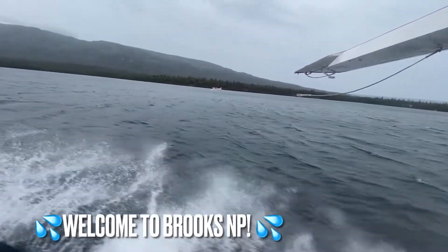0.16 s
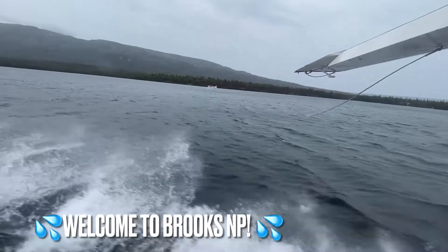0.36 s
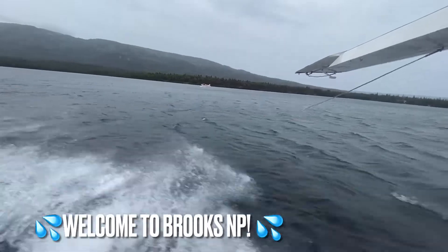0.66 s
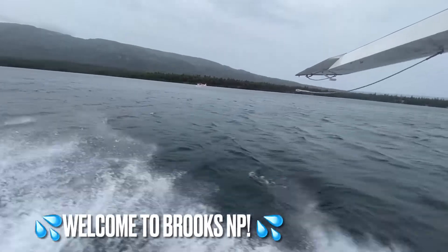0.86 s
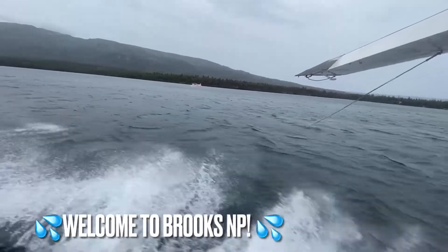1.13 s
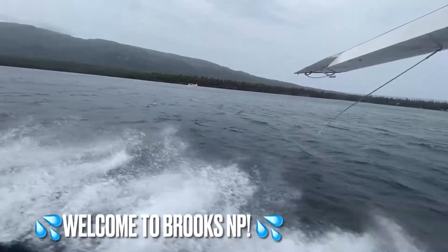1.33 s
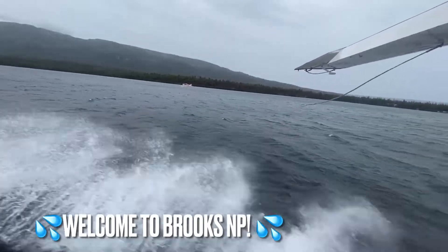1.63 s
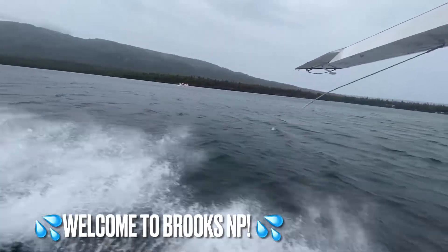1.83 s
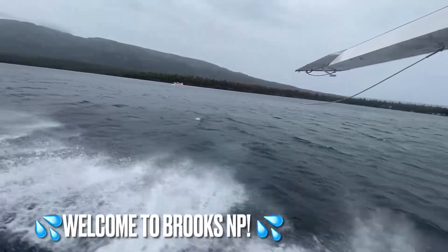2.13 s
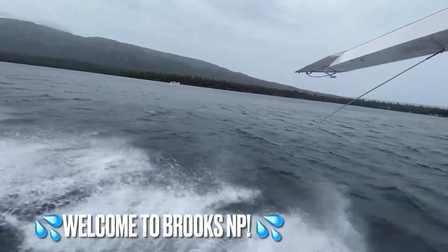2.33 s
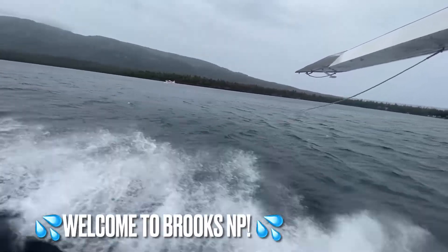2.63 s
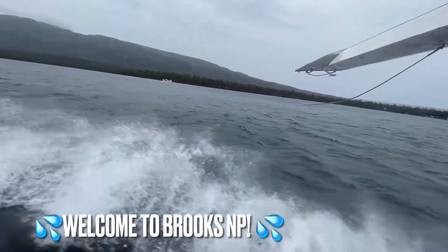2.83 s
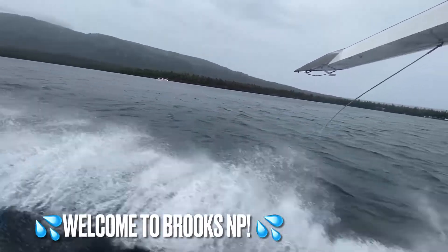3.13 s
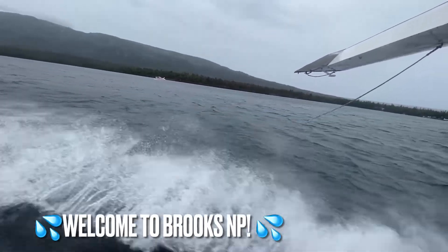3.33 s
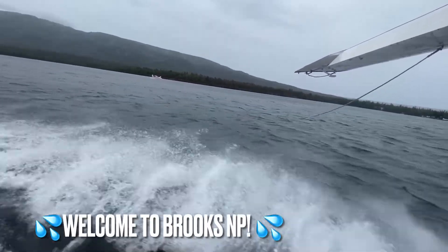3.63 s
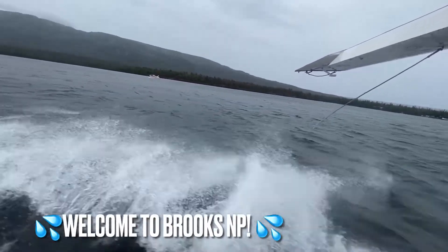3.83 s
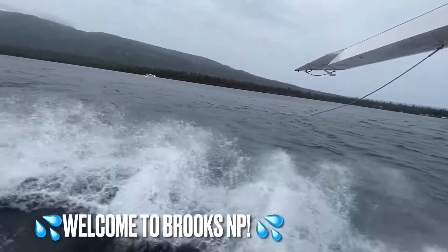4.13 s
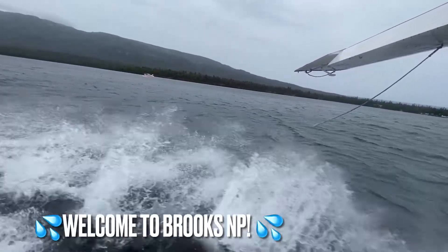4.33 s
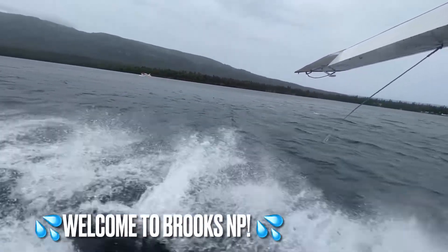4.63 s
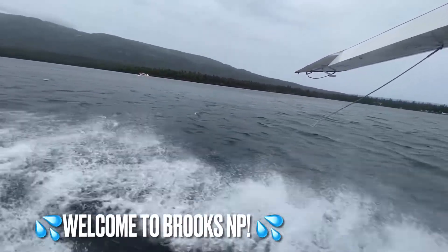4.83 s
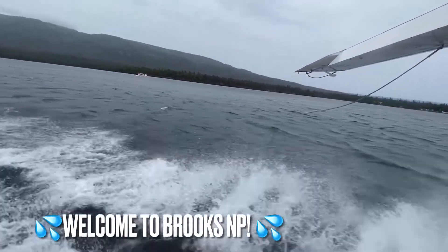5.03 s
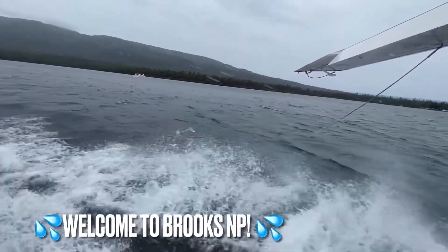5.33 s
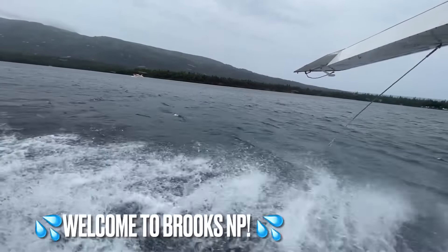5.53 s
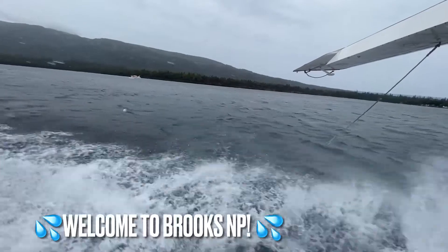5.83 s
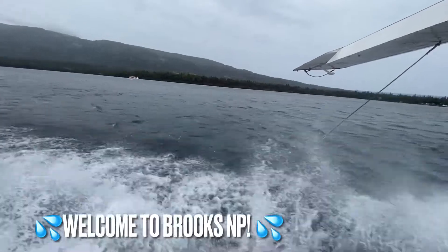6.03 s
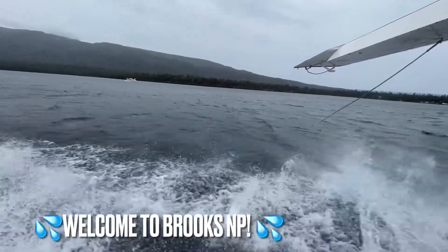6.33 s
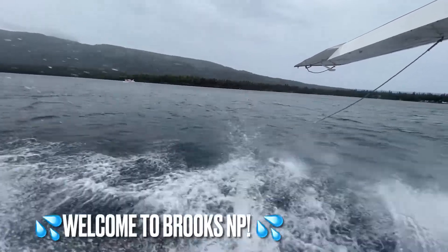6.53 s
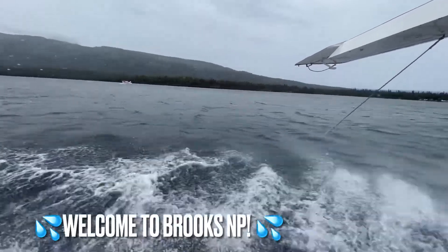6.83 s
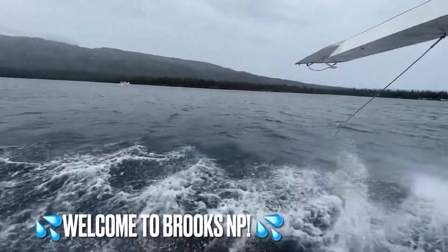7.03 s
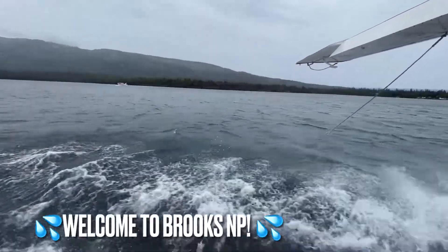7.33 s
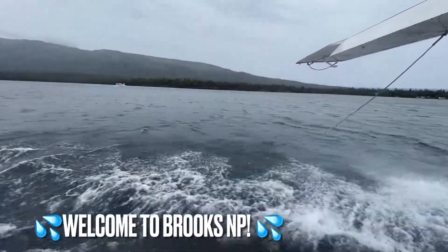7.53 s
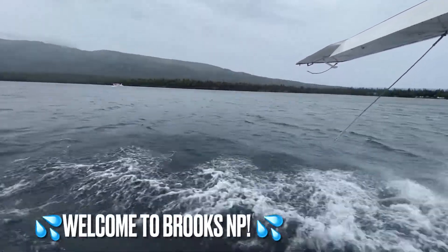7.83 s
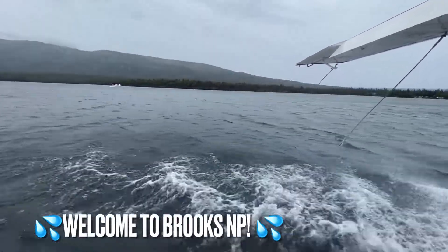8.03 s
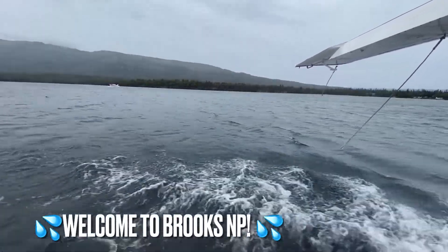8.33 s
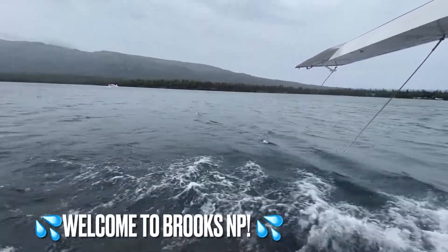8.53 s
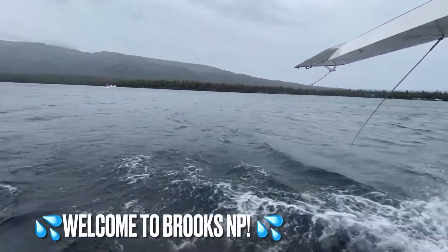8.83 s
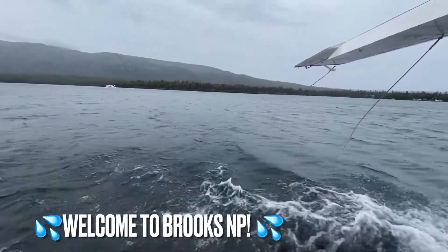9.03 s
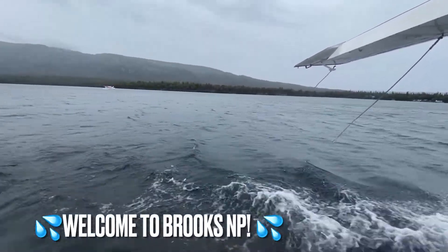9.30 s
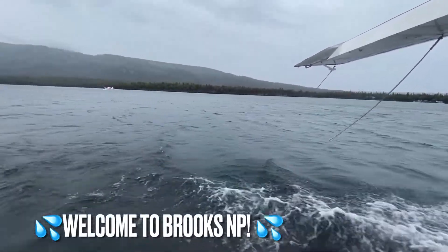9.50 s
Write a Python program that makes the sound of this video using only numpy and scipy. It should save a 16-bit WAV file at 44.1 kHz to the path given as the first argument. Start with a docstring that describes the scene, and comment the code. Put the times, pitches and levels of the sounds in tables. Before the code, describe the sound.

In a floatplane cabin on a lake, a radial engine's low drone sinks steadily while waves thump the hull and sheets of spray slap the skin. A panel squeaks in thin, high, rapid chirps until about six seconds. Water rushes along the floats with hiss and droplets. Past seven seconds the throttle opens and the engine swells into a rough growl that holds to the end. Close stereo pickup inside.

```python
"""Inside a floatplane cabin on a lake, two microphones: first the radial engine winds down, its firing tone
and uneven cylinders summed as sines, over filtered noise for wave rumble, rush along the floats and spray hiss.
From the start to 6 s a trim panel squeaks in short gliding tones; until about 7.5 s waves thump and ring the hull;
all through, sheets of spray slap the skin in noise bursts, and a few drops tick among stray ringing droplets.
The finest mist comes up towards 7 s; at 7.3 s the throttle opens and the engine surges, growling, to the end."""
import sys
import numpy as np
from scipy import signal
from scipy.fft import rfft, irfft, next_fast_len
from scipy.io import wavfile

SR = 44100
rng = np.random.default_rng(int(sys.argv[2]) if len(sys.argv) > 2 else 0)


def transcribe(u):
    """Save the signal u as a 16-bit wav file named by the first command-line argument.

    u: samples, shape (n,) or (channels, n), limited to [-1, 1]; the rate is SR.
    q: integer samples, one column per channel.
    """
    v = np.clip(np.atleast_2d(u).T, -1, 1)
    q = np.round(v * 32767).astype(np.int16)
    wavfile.write(sys.argv[1], SR, q)


N = 426006
SIZE = next_fast_len(N)
HZ = np.maximum(np.arange(SIZE // 2 + 1) * SR / SIZE, 1)  # FFT grid, kept above zero for the logarithm
CYLINDERS = 9
THROTTLE_S = 7.28  # the throttle is opened

# engine speed: t/s, firing rate/(firings per s)
SPEED = [(0, 79), (.4, 74.5), (1.2, 60.4), (2, 50.4), (2.8, 43.7), (4, 35), (5.2, 28.5), (6, 25.8),
         (6.45, 22.5), (6.8, 24.9), (7.25, 23.5), (7.4, 34.5), (7.8, 55.8), (8, 63.3), (8.2, 66.8),
         (8.4, 69.5), (8.7, 68.6), (9.15, 65.3), (9.66, 65.5)]
# waves thumping the floats: t/s, jump of the water's level/dB, fade/s, deep ring peak/dB, upper ring peak/dB
THUMPS = [(.048, 0, .04, -22, -9.5), (.105, 1.5, 0.042, -16, -6), (.427, 3.5, 0.081, -8, -10),
          (0.967, 2, .05, -18, -18), (1.452, 2, .03, -20, -20), (1.486, 4.5, 0.13, -3, -10),
          (1.647, 3, 0.036, -20, -11), (1.847, 4.5, .06, -3, -10.5), (1.93, 1, .03, -5, -18),
          (1.983, 2.5, 0.064, -18, -5.5), (2.015, 1, .03, -5, -16), (2.339, 3.5, .07, -10, -13),
          (2.502, 2.5, 0.025, -11, -8.5), (3.32, 2, 0.062, -16, -11), (3.444, -2.5, .03, -8, -20),
          (3.557, 6, 0.13, -4, -7.5), (3.59, 3, .04, -20, -7), (3.64, 1.5, 0.066, -18, -4.5),
          (3.75, 0.5, 0.029, -13, -9), (4.064, 3.5, 0.034, -18, -15), (4.199, 2.5, 0.03, -12, -11),
          (4.38, 3.5, 0.03, -16, -11), (4.681, 6, 0.023, -14, -11), (5.599, 1, .05, -9, -9.5),
          (5.73, 1.5, .05, -18, -9.5), (5.931, 2.5, 0.076, -15, -13), (6.629, 5, 0.023, -12, -10),
          (7.029, 1, 0.045, -20, -14), (7.154, 4, .04, -4, -16), (7.451, 1.5, 0.048, -16, -12.5)]


def engine():
    """Firing tone, octave, uneven lines and growl; at low speed the firing tone sinks, its octave comes forward."""
    # uneven cylinders repeat every full cycle: multiple of the cycle rate, level against the firing tone/dB
    uneven = [(5, -22), (6, -21), (7, -15), (8, -11), (10, -16), (11, -26), (12, -18), (13, -22)]
    # what the hull lets in, throttle shut: firing rate/(firings per s), firing tone level/dB, octave level/dB
    boom = [(22, -46, -16), (24.5, -45, -15), (26.3, -40, -17), (29.5, -38, -21), (31.5, -36, -20),
            (34.7, -31, -25), (38.6, -29, -26), (41.5, -22, -26), (43.5, -16.5, -28), (52.3, -16.5, -32),
            (65.5, -15.5, -38), (80.5, -17, -31)]
    throttle_rise_s, growl_rise_s = 0.046, .35
    tone_gain_db, octave_gain_db = 6.5, 3.5  # lasting gains on opening
    kick_db, kick_fade_s = 6.5, 0.54  # a surge while the engine gains speed
    growl_db, growl_gain_db = -38, 13  # one line with the throttle shut, and the gain on opening

    per_s, = in_time(SPEED)
    age = np.maximum(np.arange(N) / SR - THROTTLE_S, 0)
    opened = np.minimum(age / throttle_rise_s, 1)
    surge_db = kick_db * np.exp(-age / kick_fade_s)
    speeds, *levels = np.transpose(boom)
    tone_db, octave_db = (np.interp(per_s, speeds, db) for db in levels)
    tone_db = tone_db + opened * (tone_gain_db + surge_db)
    octave_db = octave_db + opened * (octave_gain_db + surge_db)
    growl_db = growl_db + np.minimum(age / growl_rise_s, 1) * growl_gain_db

    firing_phase = 2 * np.pi * np.cumsum(per_s * waver(6, .05)) / SR
    cycle = (firing_phase / CYLINDERS % (2 * np.pi)).astype(np.float32)
    beats = sum(amp(db) * np.sin(multiple * cycle + rng.uniform(0, 2 * np.pi)) for multiple, db in uneven)
    tone = amp(tone_db) * (np.sin(firing_phase) * waver(6, .6) + beats * waver(3, 1.0))
    rough = amp(growl_db) * growl(cycle) * waver(4, 1.5)
    octave = amp(octave_db) * waver(6, 1.5) * np.sin(2 * firing_phase + 1)
    return np.sqrt(2) * (tone + rough + octave) * amp([[.6], [-.6]])  # a touch louder on the left


def growl(cycle):
    """One rough waveform repeats every engine cycle; the cabin picks out its resonances."""
    # cabin resonances: f/Hz, level per line/dB
    cabin = [(80, -60), (103, -8), (122, -1), (140, -13), (157, 0), (176, -16), (203, -7), (226, -19),
             (253, -5), (275, -15), (298, -7), (345, -14), (390, -26), (415, -18), (600, -60)]
    places = np.linspace(0, 2 * np.pi, 2048)
    shape = sum(np.sin(multiple * places + rng.uniform(0, 2 * np.pi)) for multiple in range(14, 100))
    repeated = np.interp(cycle, places, shape)
    return irfft(rfft(repeated, SIZE) * amp(over_hz(cabin)), SIZE)[:N]


def hull_water():
    """Waves shake the hull in a deep rumble and drum on its skin; each thump shifts mostly the drumming."""
    # water on the hull: t/s, rumble level/dB, skin drumming level/dB
    hull_levels = [(0, -14.5, -19), (.7, -16, -25), (1.6, -14.5, -24), (2.7, -16, -26), (3.3, -16.5, -27.5),
                   (3.8, -14.5, -26), (4.4, -16, -25.5), (5, -15.5, -24), (5.6, -15.5, -25),
                   (6, -14.5, -26), (6.4, -20, -25.5), (7.1, -18.5, -25), (7.35, -17.5, -21.5),
                   (7.6, -20, -20), (7.9, -34, -19.5), (8.5, -17.5, -22), (9.66, -13.5, -20)]
    # rumble spectrum, the hull booms near 160 Hz: f/Hz, level per Hz/dB
    rumble_spectrum = [(14, -40), (26, -40), (33, -6), (40, 1), (55, 1), (70, -1), (88, 0), (120, -7),
                       (140, -8), (158, -2.5), (180, -9.5), (260, -22.5), (340, -42), (600, -120)]
    # drumming spectrum: f/Hz, level per Hz/dB
    drum_spectrum = [(120, -60), (200, -0.5), (227, -6.5), (252, -5.5), (275, -7), (300, -3.5), (400, -3),
                     (501, -12.5), (644, -13), (700, -15.5), (910, -25), (1540, -120)]
    rumble_thump_share = 0.15  # the rumble takes this share of a thump's jump in dB
    rumble_db, drum_db = in_time(hull_levels)
    lift = thumps()
    rumble = amp(rumble_db) * stereo_noise(rumble_spectrum, patchy_db=1.4, flicker_rate=8.0)
    drumming = amp(drum_db) * stereo_noise(drum_spectrum, patchy_db=1.95, flicker_rate=8.0)
    return rumble * lift ** rumble_thump_share + drumming * lift


def float_wash():
    """Water rushes past the floats as mid-band noise under brighter spray hiss; its colour drifts."""
    # along the floats: t/s, rush level/dB, spray hiss level/dB
    float_levels = [(0, -28.5, -44), (.25, -30, -44.5), (1, -30, -47), (1.5, -31, -45), (3.3, -30, -45.5),
                    (3.9, -32, -44.5), (4.75, -27, -43), (6, -28, -42.5), (6.9, -27.5, -43),
                    (7.03, -28.5, -42.5), (7.15, -30, -43), (7.4, -26, -38), (7.8, -21.5, -35),
                    (8.3, -22.5, -40), (8.6, -24.5, -41.5), (9.66, -27, -42)]
    # rush spectrum: f/Hz, level per Hz/dB
    rush_spectrum = [(290, 1), (500, -2.5), (643, -3), (727, 0), (1010, -3.5), (1180, -1), (1310, -1),
                     (1800, -5.5), (2210, -19), (2800, -28), (3640, -36), (6160, -120)]
    # hiss spectrum: f/Hz, level per Hz/dB
    hiss_spectrum = [(1290, -14), (2200, 0), (3000, -3.5), (3950, -7), (4660, -6.5), (5070, -10.5),
                     (5900, -10.5), (7200, -12.5), (8000, -12.5), (10500, -18), (12000, -19), (13500, -20)]
    # colour: t/s, lift of the band at 1.4-2.1 kHz/dB, lift of the band at 2.3-2.8 kHz/dB
    colour = [(0, -3, 2.5), (3.5, 0, -1.5), (4.3, 2, -1), (5, 1, 0), (6, 3.5, -3), (6.9, 3.5, 0.5),
              (7.03, 7.5, -3), (7.2, 4, 0.5), (7.8, -0.5, 1), (8.6, -3, 2), (9.66, 2, 0.5)]
    rush_pan_db = -8  # left minus right
    (rush_db, hiss_db), (mid_db, top_db) = in_time(float_levels), in_time(colour)
    rush_gain = amp(rush_db + np.array([[.5], [-.5]]) * rush_pan_db)
    rush = rush_gain * stereo_noise(rush_spectrum, patchy_db=0.7, flicker_rate=27.0)
    hiss = amp(hiss_db) * stereo_noise(hiss_spectrum, patchy_db=1.3, flicker_rate=12.7)
    wash = lifted(rush * thumps() + hiss, 1380, 2060, mid_db)
    return lifted(wash, 2250, 2800, top_db) * throb()


def throb():
    """With the throttle open the airframe shakes rush and hiss, a gain swinging once per engine cycle."""
    throb_db = .9  # swing either way
    per_s, = in_time(SPEED)
    opened = np.arange(N) / SR > THROTTLE_S
    return amp(throb_db * opened * np.cos(2 * np.pi * np.cumsum(per_s) / SR / CYLINDERS))


def thumps():
    """Each wave shifts the water's level at once, nearly always upwards; the shift fades back."""
    lift_db, age = np.zeros(N + SR), np.arange(SR // 2) / SR
    for s, db, fade, *_ in THUMPS:
        at = int(s * SR)
        lift_db[at:at + len(age)] += db * np.minimum(age / .003, 1) * np.exp(-age / max(fade, .01))
    return amp(lift_db[:N])


def knocks():
    """Each thump sets the hull's modes ringing briefly, a little off pitch each time."""
    # hull modes, one deep and two upper: f/Hz, level against the thump's ring peak/dB, t60/s
    modes = [(70, 0, .14), (152, 0, .09), (320, -9, .08)]
    out, age = np.zeros(N + SR), np.arange(SR // 4) / SR
    chances = rng.standard_normal((len(THUMPS), len(modes)))
    for (s, _, _, deep_db, upper_db), chance in zip(THUMPS, chances):
        at = int(s * SR)
        for (hz, mode_db, t60), db, sway in zip(modes, (deep_db, upper_db, upper_db), chance):
            envelope = amp(-60 * age / t60) * np.minimum(age * hz, 1)  # rises over one period
            ring = envelope * np.sin(2 * np.pi * hz * (1 + .05 * sway) * age)
            peak_db = mode_db + db + 60 / t60 / hz  # makes up the decay during the rise
            out[at:at + len(age)] += amp(peak_db) * ring
    return out[:N]


def slaps():
    """Each sheet of spray cracks with a noise burst; bigger sheets build and die slower and leave a trickle."""
    # spray slapping the skin: t/s, level/dB
    sheets = [(0.1166, -29), (0.5152, -34), (0.6694, -34), (1.363, -27.5), (1.453, -46), (1.5399, -32),
              (1.8791, -32.5), (2.069, -23), (2.214, -24.5), (3.1777, -31.5), (3.7549, -35.5),
              (4.0292, -38), (4.0617, -34), (4.199, -34), (4.6269, -32.5), (4.788, -35), (4.9387, -34),
              (4.9711, -33.5), (5.1337, -31.5), (5.3093, -31), (5.5288, -32.5), (5.559, -29), (5.7274, -36),
              (5.9224, -36), (5.9589, -30), (6.2951, -32), (6.4173, -33), (6.5136, -32), (6.791, -30.5),
              (7.0783, -31.5), (7.1147, -29.5), (7.3991, -30), (7.5772, -31), (7.9059, -42),
              (8.0406, -31.5), (8.1194, -42), (8.5051, -29), (8.7974, -30.5), (8.867, -32), (8.988, -43),
              (9.05, -42), (9.172, -39), (9.2688, -33), (9.385, -53)]
    # slap spectrum, the window rings near 4.6 and 7 kHz: f/Hz, level per Hz/dB
    slap_spectrum = [(500, -8), (900, 4.5), (1500, 4), (2400, -5.5), (3400, -7.5), (4000, -9.5), (4600, -8),
                     (5500, -15), (6600, -13.5), (7000, -9), (7400, -14.5), (10000, -20.5), (13500, -30),
                     (14500, -40)]
    spatter_band_hz = 5300, 6300  # the window rings here
    spatter_db, spatter_t60_s = 1, .03  # the first drops of a sheet crack on the window
    t, shape, crack = np.arange(N) / SR, np.zeros(N), np.zeros(N)
    for s, db in sheets:
        span = slice(int((s - .003) * SR), int((s + .35) * SR))
        age = t[span] - t[span][0]
        size = amp(db + 36.0)  # 1 for a sheet at -36 dB
        t60 = 0.053 * size ** 0.98
        decay = amp(-60 * age / t60) + 0.21 * amp(-18 * age / t60)  # the burst, then the trickle
        shape[span] += amp(db) * decay * np.clip(age / (0.002 * size), 0, 1)
        crack[span] += amp(db + spatter_db - 60 * age / spatter_t60_s) * np.clip(age / .002, 0, 1)
    burst = shape * stereo_noise(slap_spectrum, patchy_db=2.0, flicker_rate=150)
    band = signal.butter(2, spatter_band_hz, "band", fs=SR, output="sos")
    return burst + signal.sosfilt(band, crack * rng.standard_normal((2, N)))


def squeaks():
    """Rubber slips on metal: a brief, shaky high tone that slides a little; its octave speaks first."""
    # panel squeaks: t/s, fundamental level/dB, octave level/dB
    chirps = [(.014, -37, -56), (.049, -46, -60), (.098, -33, -48), (.147, -32, -48), (.193, -36, -55),
              (.255, -50, -66), (.29, -45, -62), (.333, -39, -54), (.375, -45, -55), (.422, -31, -47),
              (.465, -38, -59), (.59, -39, -56), (.624, -38, -65), (.85, -38, -55), (.894, -38, -50),
              (.938, -46, -54), (.976, -44, -53), (1.26, -50, -69), (1.29, -54, -61), (1.324, -47, -54),
              (1.397, -37, -66), (1.437, -44, -60), (1.513, -41, -55), (1.551, -42, -52), (1.664, -43, -55),
              (1.713, -49, -52), (1.757, -44, -55), (1.81, -38, -47), (1.914, -35, -42), (1.956, -50, -55),
              (2.16, -48, -56), (2.201, -42, -51), (2.242, -37, -46), (2.295, -39, -45), (2.337, -39, -53),
              (2.375, -36, -50), (2.414, -41, -47), (2.528, -41, -53), (2.572, -39, -45), (2.617, -40, -44),
              (2.672, -37, -44), (2.717, -45, -45), (2.762, -50, -58), (2.864, -35, -50), (3.34, -40, -46),
              (3.377, -39, -45.5), (3.418, -43, -42.5), (3.458, -51, -62), (3.584, -39, -42),
              (3.629, -40, -42), (3.675, -47, -54), (3.721, -40, -44), (3.76, -39, -47), (4.554, -44, -53),
              (4.685, -47, -57), (4.724, -39, -54), (5.157, -39, -54), (5.198, -40, -46), (5.591, -42, -56),
              (5.86, -44, -58), (5.95, -46, -58), (5.987, -38, -47)]
    pitch_hz, spread_hz, wobble_hz = 4175, 9, 24  # the slip is uneven
    length_s, length_spread = 0.033, 0.14  # the spread is a share of the length
    sag_from_s, sag_hz_per_s = 3.8, 22  # the late squeaks sit lower
    out, chances = np.zeros((2, N)), rng.standard_normal((len(chirps), 4))
    wobble = wobble_hz * np.log(waver(60, 20 / np.log(10)))  # the log turns the gain into a plain wander
    for (s, db, octave_db), (detune, glide, sway, stretch) in zip(chirps, chances):
        part = np.linspace(0, 1, int(max(length_s * (1 + length_spread * stretch), .005) * SR))
        hz = pitch_hz - sag_hz_per_s * max(s - sag_from_s, 0)
        hz = hz + spread_hz * (detune + glide * (part - .5)) + wobble[int(s * SR):][:len(part)]
        phase = 2 * np.pi * np.cumsum(hz) / SR
        low = amp(db) * np.sin(np.pi * part ** 0.8) ** 1.6 * np.sin(phase + np.array([[0], [2.6]]))
        low = low * amp([[-4], [3]])  # stronger on the right
        high = amp(octave_db) * np.sin(np.pi * part ** 0.41) ** 1.5 * np.sin(2 * phase)
        high = high * amp(np.array([[-1 + sway], [1 - sway]]))
        at = int((s - .006) * SR)
        out[:, at:at + len(part)] += low + high
    return out * waver(120, 3)


def ticks():
    """A drop on the window is a brief burst of bright noise."""
    # drops on the window: t/s, strength before the high-pass and pan/dB, t60/s
    drops = [(0.116, -29, .008), (0.3002, -38, .008), (0.6, -24, 0.0092), (1.3623, -31, 0.0097),
             (6.5013, -25, .008), (8.043, -39, .08)]
    out, age = np.zeros(N), np.arange(2000) / SR
    for (s, db, t60), grit in zip(drops, rng.standard_normal((len(drops), 2000))):
        out[int(s * SR):int(s * SR) + 2000] += amp(db - 60 * age / t60) * grit
    out = signal.sosfilt(signal.butter(4, 6800, "high", fs=SR, output="sos"), out)
    return out * amp([[1.5], [-1.5]])  # nearer the left


def droplets():
    """Stray droplets land at random, each ringing a few cycles at one of eight pitches."""
    droplets_per_s, droplet_db = 60, -30  # typical rate on each side before it wanders; overall gain
    born = rng.random((2, N)) < droplets_per_s * waver(3, 5) / SR
    sizes = born * amp(4 * np.minimum(rng.exponential(1, (2, N)), 3))
    dealt, out = rng.integers(0, 8, N), 0
    for k, hz in enumerate(np.geomspace(1200, 7000, 8)):
        r, w = amp(-60 * hz / 12 / SR), 2 * np.pi * hz / SR  # dies by 60 dB in 12 cycles
        strikes = sizes * (dealt == k) + 1e-18
        out = out + signal.lfilter([0, np.sin(w) * 1200 / hz], [1, -2 * r * np.cos(w), r * r], strikes)
    return amp(droplet_db) * out


def fine_mist():
    """The finest spray is a thin band of noise in the top treble."""
    # level of the top treble: t/s, level/dB
    mist_levels = [(0, -64), (4, -60.5), (4.8, -57.5), (5.5, -53.5), (7, -53), (7.7, -51), (8.1, -56),
                   (8.6, -62), (9.66, -59)]
    # mist spectrum: f/Hz, level per Hz/dB
    mist_spectrum = [(7000, -34), (9500, -6), (10800, -4.5), (12000, -4), (13300, -6), (14000, -9),
                     (15000, -30)]
    mist_db, = in_time(mist_levels)
    return amp(mist_db) * stereo_noise(mist_spectrum, patchy_db=0.5, flicker_rate=12)


def stereo_noise(spectrum, patchy_db, flicker_rate):
    """Coloured noise as the two microphones hear it, in bands that flicker partly together; rms 1."""
    # the two microphones: f/Hz, likeness/0-1, phase by which the right leads/rad, left minus right/dB
    microphones = [(57.6, 0.98, -0.5, 0), (175, 0.93, 0.52, 3), (320, 0.63, 0.57, 6),
                   (431.2, 0.59, -5, -0.5), (494, 0.27, 2.5, 1), (646, 0.93, 2, -1), (780, 0.66, 4, 4.5),
                   (1300, 0.65, 5.0, -0.5), (1733, 0.55, 3, -0.5), (2100, 0.23, -0.5, -0.5),
                   (3570, 0.27, 2.5, -1), (5600, 0.12, 7, -9.5), (7340, 0.4, -2, -6), (10000, 0, -8, 5.5),
                   (10100, 1, -2.5, 2), (13500, 1, 1, -0.5)]
    bands_per_octave = 1.25
    shared, own = rfft(rng.standard_normal((2, SIZE)))
    alike = np.clip(over_hz(microphones), 0, 1)
    lead = np.exp(1j * over_hz(microphones, axis=2))
    right = alike * shared * lead + np.sqrt(1 - alike ** 2) * own
    tilt = amp(over_hz(microphones, axis=3) / 2)
    pair = (amp(over_hz(spectrum)) * np.array([shared * tilt, right / tilt])).astype(np.complex64)
    edges_hz = [spectrum[1][0], spectrum[-2][0]]
    first, last = np.round(bands_per_octave * np.log2(edges_hz)).astype(int)
    step = np.clip(bands_per_octave * np.log2(HZ), first, last).astype(np.float32)
    out = 0
    for k in range(int(first), int(last) + 1):
        band = irfft(pair * np.clip(1 - abs(step - k), 0, 1), SIZE)[:, :N]  # triangles that sum to one
        out = out + band * waver(flicker_rate, patchy_db).astype(np.float32)
    return rms_one(out * waver(flicker_rate, patchy_db))


def waver(rate, db):
    """A gain that wanders by about db: coarse noise through a double one-pole low-pass at rate Hz."""
    r = np.exp(-80 * np.pi * rate / SR)  # one coarse step is 40 samples
    slow = signal.lfilter([1], [1, -2 * r, r * r], rng.standard_normal(N // 40 + 2002))[2000:]
    return np.interp(np.arange(N) / 40, np.arange(len(slow)), amp(db * rms_one(slow)))


def lifted(x, low_hz, high_hz, db):
    """Raise or lower one band."""
    band = signal.butter(1, [low_hz, high_hz], "band", fs=SR, output="sos")
    return x + (amp(db) - 1) * signal.sosfilt(band, x)


def amp(db):
    """Decibels to gain."""
    return np.exp(np.asarray(db) * (np.log(10) / 20))


def rms_one(x):
    """Scale to unit power."""
    return x / np.sqrt(np.mean(x ** 2) + 1e-20)


def in_time(rows):
    """Each column of a curve table, sample by sample."""
    s, *columns = np.transpose(rows)
    return [np.interp(np.arange(N) / SR, s, c) for c in columns]


def over_hz(points, axis=1):
    """One column of a frequency table on the FFT grid, straight lines over log frequency."""
    points = np.array(points)
    return np.interp(np.log(HZ), np.log(points[:, 0]), points[:, axis])


def scene():
    """Everything heard in the cabin."""
    lake = hull_water() + float_wash() + knocks()
    spray = slaps() + ticks() + droplets() + fine_mist()
    return engine() + lake + squeaks() + spray


def record(dry):
    """The microphones lose the deepest bass, peaks are rounded, the top is cut."""
    mic_low_hz, ceiling, cutoff_hz = 30, 1.1, 13900  # the ceiling is in full scales
    x = np.concatenate([dry[:, SR // 4:0:-1], dry], axis=1)  # the mirrored start runs the filters in
    x = signal.sosfilt(signal.butter(2, mic_low_hz, "high", fs=SR, output="sos"), x)
    x = x / (1 + (abs(x) / ceiling) ** 5) ** .2
    return signal.sosfilt(signal.ellip(10, .5, 70, cutoff_hz, fs=SR, output="sos"), x)[:, SR // 4:]


dry = scene()
out = record(dry)
transcribe(out)
```